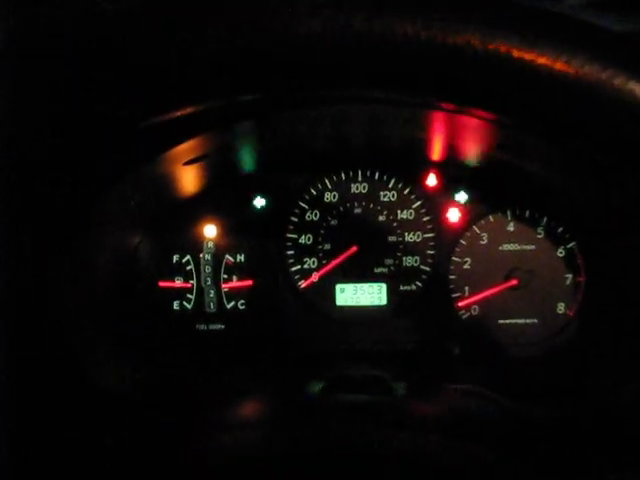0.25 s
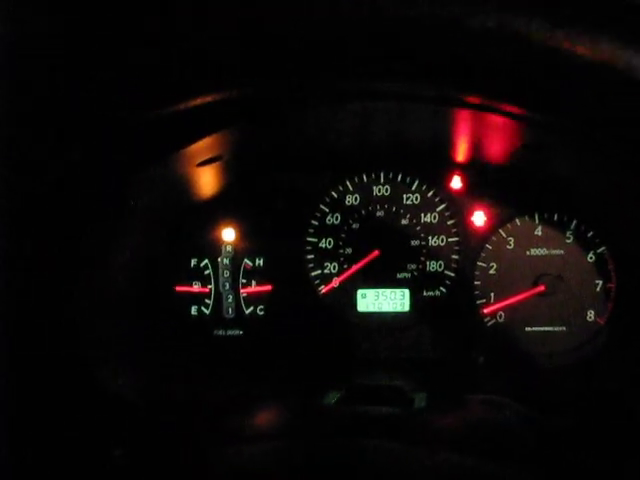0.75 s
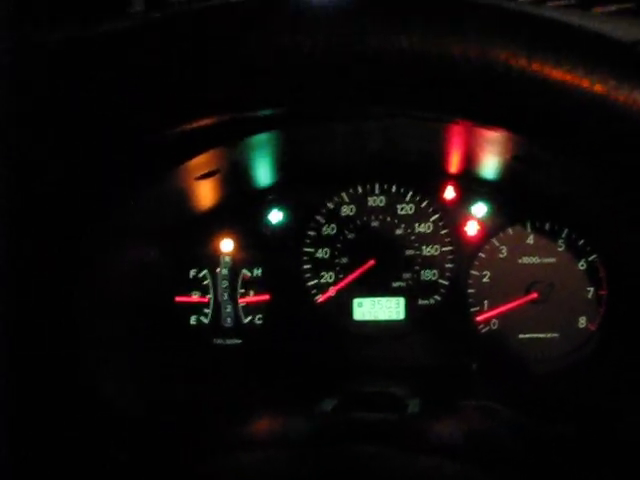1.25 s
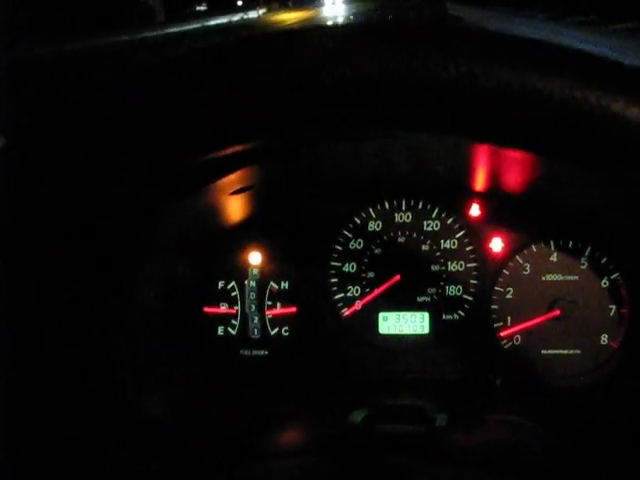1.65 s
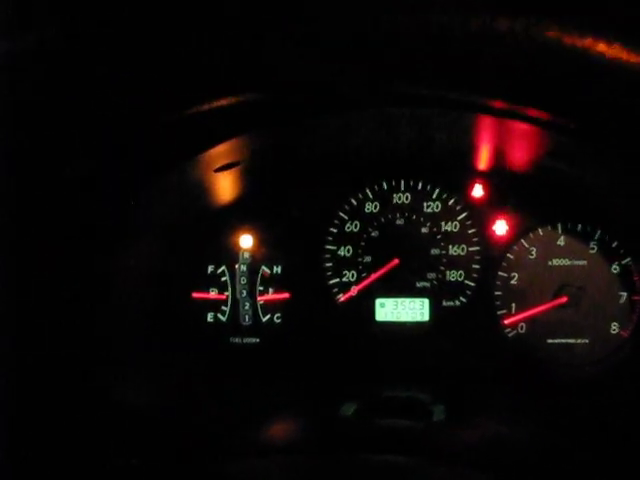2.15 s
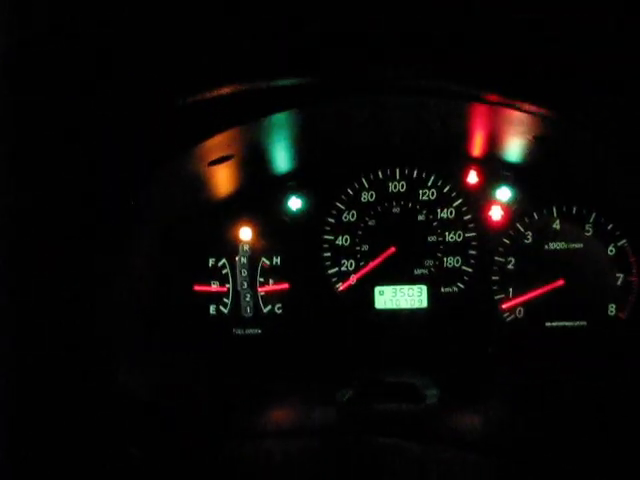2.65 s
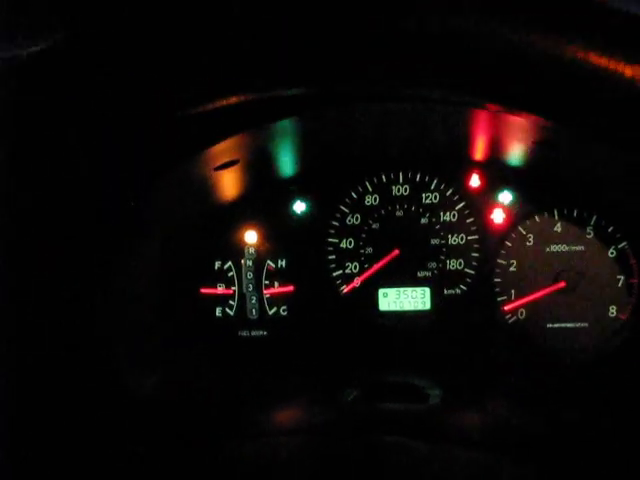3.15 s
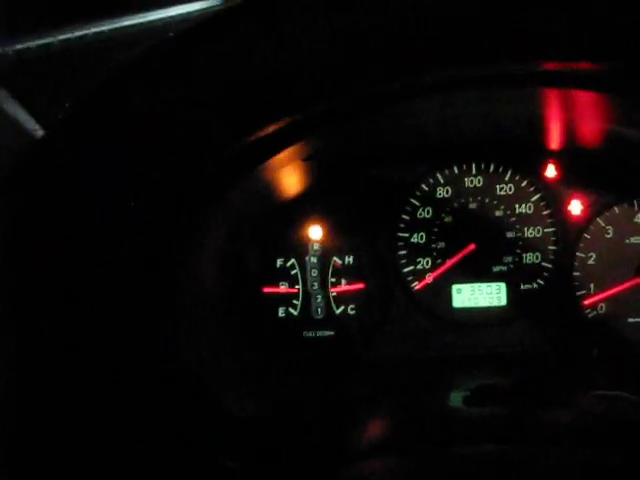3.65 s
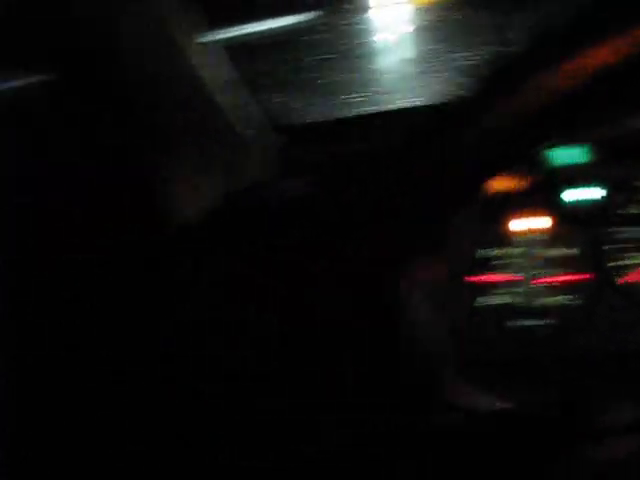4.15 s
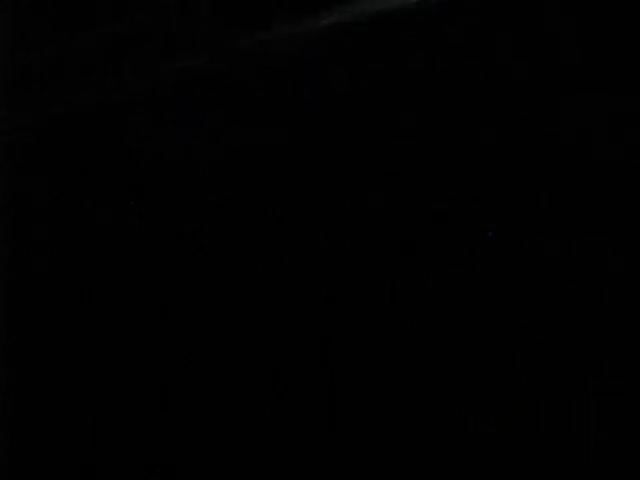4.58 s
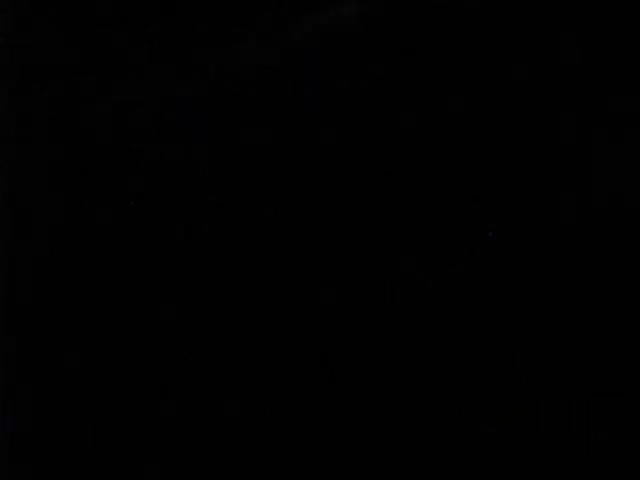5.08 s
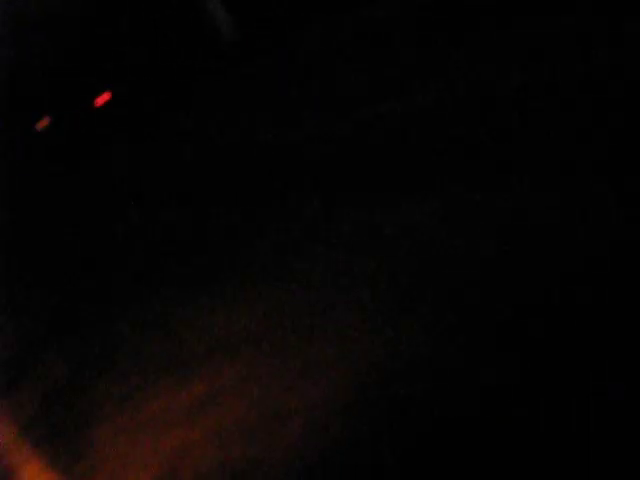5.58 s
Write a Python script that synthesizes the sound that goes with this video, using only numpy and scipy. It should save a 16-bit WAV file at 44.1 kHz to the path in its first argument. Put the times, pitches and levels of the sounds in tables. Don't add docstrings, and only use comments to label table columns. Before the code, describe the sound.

Inside a dark car at night, a four-cylinder engine idles with a low, booming exhaust drone that sags slightly and recovers. A turn-signal relay clicks in alternating brighter ticks and duller tocks. Light cloth rustle, tiny key tinkles and trim taps surround it. Around three seconds a hard lever knock makes the steady sound duck briefly. Then the handheld microphone turns to the window, with thumps, passing tyre wash and rough wind buffeting.

```python
import sys
import numpy as np
from scipy import signal
from scipy.fft import rfft, irfft, next_fast_len
from scipy.io import wavfile
from scipy.ndimage import uniform_filter1d

SR = 44100
rng = np.random.default_rng(int(sys.argv[2]) if len(sys.argv) > 2 else 0)


def undo_db(level):
    steps = np.asarray(level, float) / 20
    return 10 ** steps


def output_pcm(signal):
    pcm = np.clip(np.atleast_2d(signal).T, -1, 1) * 32767
    wavfile.write(sys.argv[1], SR, np.round(pcm).astype(np.int16))


N = 256647
FFT_LENGTH = next_fast_len(N)
TIME_S = np.arange(N) / SR
OPPOSED = np.array([[1], [-1]])
TURN_S, WINDOW_S = (2.96, 4.61), (4.626, 4.69)


def band(x, lo_hz, hi_hz, order=2):
    return signal.sosfilt(signal.butter(order, [lo_hz, min(hi_hz, .45 * SR)], "band", fs=SR, output="sos"), x)


def unit(x):
    return x / np.sqrt(np.mean(x ** 2))


def walk(rate):
    hold = int(SR / rate)
    steps = np.repeat(rng.standard_normal(N // hold + 1), hold)
    return 1.49 * uniform_filter1d(uniform_filter1d(steps, hold), hold)[:N]


def curves(table):
    s, *columns = np.transpose(table)
    return [np.interp(TIME_S, s, column) for column in columns]


def ramp(start_s, end_s):
    return np.clip((TIME_S - start_s) / (end_s - start_s), 0, 1)


def bell(s, half_s):
    return np.exp(-((TIME_S - s) / half_s) ** 2)


def pair(x, pan_db):
    return np.array([x * undo_db(pan_db / 2), x * undo_db(-pan_db / 2)]).reshape(2, -1)


def add(out, s, sound):
    i = int(s * SR)
    out[:, i:i + sound.shape[1]] += sound[:, :N - i]


# t/s, firing rate f/Hz
FIRING_RATE = [(0, 22.5), (.25, 22.9), (.5, 22.65), (1, 22.75), (1.45, 22.15), (1.8, 22.15), (2, 21.75),
               (2.15, 21.8), (2.3, 22.4), (2.5, 22.85), (2.75, 22.9), (3.06, 23.5), (3.5, 23.4),
               (3.9, 23.9), (4.1, 23.7), (4.7, 24.3), (5.82, 23.7)]
# level/dB, change per Hz of sag/dB, change on turning/dB, further change at the window/dB
LOW_HARMONICS = [
    (-16, 1.5, -12.5, -3),
    (-21, 5, -1, -7),
    (-20, -5, -8, -0.5),
    (-23, -3, 1, -1),
]
LOW_SIDE_SHARE = [.02, .02, .05, .11]
# multiple of the firing rate, level re first/dB, opposed share at the side ports [0-1]
UPPER_HARMONICS = [(5, -8, .05), (6, -17, .12), (7, -27, .1), (8, -27, .07), (13, -37, .1), (14, -38, .1)]
# f/Hz, phase lag of all that lies above/rad
CABIN_RESONANCES = [(57, 1.9), (102, 2.2)]
THROB_DEPTH = {1: .55, 5: .55, 6: .3}
SAG_HZ = 22.6
NULL_HZ, NULL_WIDTH_HZ, NULL_DB = 44.0, .45, -13


def exhaust(spread=.2, lead_per_hz=.9, turn_lead=2.8, wander_db=.4, wander_rad=.07):
    (hz,), turn, window = curves(FIRING_RATE), ramp(*TURN_S), ramp(*WINDOW_S)
    sag = np.maximum(SAG_HZ - hz, 0)
    lines = []
    for k, (db, sag_db, turn_db, window_db) in enumerate(LOW_HARMONICS, 1):
        null_db = NULL_DB * np.exp(-((k * hz - NULL_HZ) / NULL_WIDTH_HZ) ** 2 / 2)
        level_db = db + sag_db * sag + turn_db * turn + window_db * window + null_db
        lines.append((k, level_db, LOW_SIDE_SHARE[k - 1]))
    first_db = lines[0][1]
    for k, db, side in UPPER_HARMONICS:
        turn_db = 4.0 if k < 6 else 13.0
        lines.append((k, first_db + 1.75 * window + turn_db * turn + db, side))
    turns = 2 * np.pi * np.cumsum(hz) / SR
    lead = lead_per_hz * (22.75 - hz) + turn_lead * turn
    shake = unit(band(rng.standard_normal(N), 22, 125, order=3))
    out = undo_db(first_db - 13.5 + 2 * turn) * shake
    for k, db, side in lines:
        lag = sum(rad * (k * SAG_HZ > f) for f, rad in CABIN_RESONANCES)
        phase = k * turns + lead - spread * k ** 2 - lag + wander_rad * np.sqrt(k) * walk(6)
        waver_db = wander_db * (1 + turn + window) * min(1 + k * k / 12, 5) * walk(7)
        size = np.sqrt(2) * undo_db(db + waver_db)
        throb = THROB_DEPTH.get(k, 0) * np.cos(turns / 4 + .75 - .37 * (k - 1))
        size = size * (1 + ramp(3.0, 3.4) * throb)
        out = out + size * (np.cos(phase) - side * np.sin(phase) * OPPOSED)
    return out


def gain_of_points(points):
    hz, db = np.transpose(points)
    f = np.maximum(np.arange(FFT_LENGTH // 2 + 1) * SR / FFT_LENGTH, 1)
    return undo_db(np.interp(np.log(f), np.log(hz), db, left=-200, right=-200))


# f/Hz, left-right correlation [-1 to 1]
COHERENCE = [(60, 0.99), (300, 0.98), (1000, 0.75), (2000, 0.25), (4000, -0.093), (16000, -0.0075)]


def spread_noise(points, flicker_db, flicker_rate, shared_db, grain_db, lo_hz, hi_hz):
    grains = grain_db * uniform_filter1d(rng.exponential(size=N), size=24) + shared_db * walk(2 * flicker_rate)
    mid, side = rfft(rng.standard_normal((2, N)) * undo_db(grains), FFT_LENGTH) * gain_of_points(points)
    octave = np.log2(np.arange(FFT_LENGTH // 2 + 1) * SR / FFT_LENGTH + 1)
    hz, correlation = np.transpose(COHERENCE)
    like = np.clip(np.interp(octave, np.log2(hz), correlation), -.99, .99)
    mid, side = mid * np.sqrt(1 + like), side * np.sqrt(1 - like)
    both = np.array([mid + side, mid - side])
    lowest, highest = int(np.log2(points[1][0])), int(np.log2(points[-2][0])) + 1
    out = 0
    for centre in range(lowest, highest + 1):
        window = np.clip(1 - abs(octave - centre), 0, 1)
        out = out + undo_db(flicker_db * walk(flicker_rate)) * irfft(both * window, FFT_LENGTH)[:, :N]
    return out / np.std(band(out.mean(axis=0), lo_hz, hi_hz, order=4))


# t/s, length/s, level change/dB
RESTS = [(0.643, 0.061, 1.5), (0.75, 0.089, -2), (1.134, 0.038, -4), (1.394, 0.1, -6), (1.706, 0.034, -4.5),
         (2.17, 0.2, -4), (2.502, 0.068, -8.5), (3.487, 0.1, 0.5), (3.683, 0.13, -3.5)]


def resting_db():
    dips = sum(db * ((TIME_S > s) & (TIME_S < s + length)) for s, length, db in RESTS)
    return uniform_filter1d(dips, size=400)


# f/Hz, level per Hz/dB
RUMBLE_SPECTRUM = [(82, 6.5), (140, -6.5), (161, -4), (195, -9), (232, -16.5), (306, -13.5), (367, -22.5),
                   (700, -27), (910, -39), (1540, -120)]
# f/Hz, level per Hz/dB
HISS_SPECTRUM = [(210, -47), (350, -1.5), (552, -6.5), (738, -3.5), (953, 0.5), (1050, -2), (1820, -6),
                 (2100, -14.5), (3060, -17.5), (5000, -36), (6500, -37), (11000, -120)]
# f/Hz, level per Hz/dB
STREET_SPECTRUM = [(260, -57), (450, -11.5), (513, -10), (723, 1), (1060, -8.5), (1720, -10), (1940, -14.5),
                   (5000, -32.5), (6500, -52), (11000, -120)]
# f/Hz, level per Hz/dB
RUSTLE_SPECTRUM = [(1470, 0), (2500, -1), (3330, -1.5), (4100, -3.5), (4820, -4.5), (5660, -8), (9640, -13),
                   (10600, -15.5), (15800, -17.5)]
# t/s, level/dB
STIR = [(0, -48), (.21, -41), (.41, -48.5), (.68, -51.5), (.92, -47), (1.3, -44.5), (1.6, -47.5),
        (1.93, -42), (2.07, -48), (2.35, -42.5), (3.05, -46.5), (3.5, -48.5), (3.9, -48.5), (4.28, -43),
        (4.6, -42.5), (5.2, -55), (5.56, -51.5), (5.82, -59)]
# t/s, half length/s, rise/dB
GRIPS = [(0.357, 0.049, 5), (1.99, 0.069, 10), (2.99, 0.64, 4.5), (3.697, 0.041, 9), (3.953, 0.29, 4),
         (4.215, 0.15, 9), (4.726, 0.3, 12)]
# t/s, half length/s, rise/dB
PASSES = [
    (4.288, 0.31, 5),
    (4.71, 0.34, 7.5),
    (5.117, 0.18, 5),
    (5.61, 0.18, 6.5),
]
RUMBLE_DB, HISS_DB, HISS_PER_STIR = -40.5, -37, 0.25


def cabin():
    (stir_db,), outside = curves(STIR), ramp(*TURN_S)
    rest_db = resting_db()
    rumble_db = RUMBLE_DB + sum(db * bell(s, half) for s, half, db in GRIPS)
    hiss_db = HISS_DB + sum(db * bell(s, half) for s, half, db in PASSES)
    hiss_db = hiss_db + HISS_PER_STIR * (1 - outside) * (stir_db + 39 + 0.8 * rest_db)
    rumble = spread_noise(RUMBLE_SPECTRUM, 1.5, 12, 1.5, 0, 190, 450)
    hiss = spread_noise(HISS_SPECTRUM, .8, 14, 1.2, 5, 600, 2500)
    street = spread_noise(STREET_SPECTRUM, 1, 10, 1, 2, 600, 2500)
    rustle = spread_noise(RUSTLE_SPECTRUM, .7, 14, 1.6, 8, 4000, 14000)
    rustle = rustle + ramp(4.5, 5.5) * (band(rustle, 1200, 12000, order=1) - rustle)
    hiss = np.sqrt(1 - outside) * hiss + np.sqrt(outside) * street
    return undo_db(rumble_db) * rumble + undo_db(hiss_db) * hiss + undo_db(stir_db + rest_db) * rustle


# t/s, level/dB, f/Hz, length/s
METAL_TOUCHES = [(.09, -50, 12100, .05), (.09, -50, 10300, .05), (.205, -48, 12100, .09),
                 (.235, -42, 10300, .06), (.25, -46, 9360, .03), (.255, -46, 6140, .04),
                 (.255, -44, 5000, .04), (1.47, -48, 7250, .08), (2.19, -48, 5000, .06),
                 (3.15, -49, 2920, .03), (.977, -29, 2350, .006), (3.335, -57, 5200, .1),
                 (3.388, -38, 5200, .01), (3.402, -35, 5450, .022), (3.05, -30, 2480, .015),
                 (3.415, -37, 2000, .014), (1.118, -36, 1900, .012), (3.4, -36, 10800, .012)]


def metal():
    out = np.zeros((2, N))
    for s, db, hz, length in METAL_TOUCHES:
        t = np.arange(int(length * SR)) / SR
        wide = 1 + max(.007, .0006 / length)
        swell = np.minimum(8 * t / length, 1) * (1 - t / length)
        touches = rng.standard_normal((2, len(t))) * swell
        add(out, s, undo_db(db) * unit(band(touches, hz / wide, hz * wide, order=1)))
    return out


# t/s, length/s, level/dB, lowest f/Hz, highest f/Hz
DRAGS = [(.203, .111, -35, 1500, 14000), (.271, .042, -31, 510, 996), (.881, .1, -43.5, 2000, 15000),
         (1.46, .097, -41.5, 2950, 15100), (1.921, .065, -31, 450, 1230), (2.833, .095, -33.5, 500, 2460),
         (3.398, .037, -34, 1000, 6960), (4.492, .043, -29.5, 2480, 10500),
         (4.103, .074, -40.5, 2000, 11940), (4.758, .075, -33, 500, 2410), (3.08, .17, -41, 400, 1800),
         (4.5, .035, -39, 10000, 15000), (3.69, .17, -33, 220, 340), (2.41, .085, -44, 2500, 14000),
         (4.598, .016, -41, 2000, 14000), (4.648, .014, -41, 2000, 8000), (3.05, .014, -31, 900, 5500),
         (3.384, .014, -35, 800, 3800), (3.072, .014, -36, 2500, 9000), (.69, .05, -49, 5000, 12000),
         (1.055, .035, -48, 6000, 15000), (4.49, .04, -33, 700, 3000), (3.199, .03, -42, 500, 4300),
         (3.066, .012, -22, 500, 3000), (3.113, .022, -34, 1500, 5500), (5.19, .012, -52, 3000, 12000)]


def rubs():
    out = np.zeros((2, N))
    for s, length, db, lo_hz, hi_hz in DRAGS:
        t = np.arange(int(length * SR)) / SR
        slips = np.repeat(1 + rng.exponential(size=200), 40)
        grains = (rng.standard_normal((2, 8000)) * slips)[:, :len(t)]
        add(out, s, undo_db(db) * unit(band(grains, lo_hz, hi_hz)) * np.sin(np.pi * t / length) ** .5)
    return out


def relay(events, modes, chatter_s, landing=5.0):
    out, t = np.zeros((2, N)), np.arange(SR // 20) / SR
    case = sum(undo_db(db) * np.sin(2 * np.pi * hz * t) * undo_db(-60 * t / min(t60, .012)) for hz, db, t60 in modes)
    for s, db, pan_db in events:
        chatter = rng.standard_normal((2, len(t))) * np.minimum(t / .0007, 1) * np.exp(-t / chatter_s)
        hiss = band(chatter, 3500, 17500)
        chatter[:, 20] += landing
        chatter[1] = 0.092 * chatter[0] + 0.69 * chatter[1]
        ring = signal.fftconvolve(chatter, case[None], axes=1)[:, :len(t)]
        ring = ring / np.abs(ring).max() + 0.42 * hiss
        add(out, s - .0005, undo_db(db - 1.5) * ring * pair(np.ones(1), pan_db))
    return out


# f/Hz, level/dB, decay time T60/s (cut to at most 0.012)
TICK_MODES = [(2950, -26, 0.04), (3456, 8, 0.012), (4660, 3.5, 0.018), (5250, -23, 5.0), (7040, -5, 0.032),
              (9900, -6, 0.021), (10720, -3.5, 0.02), (13200, -4, 0.013), (3940, 2, .008)]
# f/Hz, level/dB, decay time T60/s (cut to at most 0.012)
TOCK_MODES = [(2880, -25.5, 0.78), (3220, 8, 0.019), (4400, 4, 0.031), (6240, -6, 0.011), (7740, 0, 0.037),
              (9300, -3, 0.047), (10650, 10.5, 0.072), (11150, -4, 0.063)]
FLASH_S, TICK_S, TOCK_S = .7186, .5925, .2418
TICK_DB, TOCK_DB, RELAY_PAN_DB, RELAY_TURN_PAN_DB = -11, -14, 0, -3


def flasher():
    ticks = [(TICK_S + k * FLASH_S, TICK_DB, RELAY_PAN_DB) for k in range(6)]
    tocks = [(TOCK_S + k * FLASH_S, TOCK_DB, RELAY_PAN_DB) for k in range(7)]
    clicks = relay(ticks, TICK_MODES, chatter_s=.0035) + relay(tocks, TOCK_MODES, chatter_s=.0045)
    fade_db = -4.5 * ramp(*TURN_S) - 3.0 * ramp(*WINDOW_S)
    return clicks * pair(undo_db(fade_db), RELAY_TURN_PAN_DB * ramp(*TURN_S))


def strike(x):
    return x / np.std(x[:, :SR // 200])


# t/s, panel level/dB, crack level/dB, fizz level/dB
KNOCK_EVENTS = [(.296, -28, -44, -43), (.356, -28.5, -38, -51), (.978, -43, -33, -38),
                (1.1117, -31, -19.5, -19.5), (1.744, -32, -38.5, -42), (2.134, -30, -30, -46),
                (2.592, -52, -54, -42), (2.692, -39, -35, -21.5), (2.852, -27, -34.5, -45),
                (2.899, -31, -39, -41), (2.938, -42, -53, -35), (3.049, -20, -25, -30),
                (3.0655, -13, -19.5, -30), (3.07, -21.5, -35, -25), (3.112, -15.5, -23.5, -26),
                (3.152, -39, -51, -55), (3.199, -33.5, -66, -57), (3.385, -25, -40, -53),
                (3.4, -24, -32, -39), (3.672, -24, -40, -42), (3.986, -25, -58, -61),
                (4.074, -33, -52, -34), (4.135, -28, -33, -51), (4.487, -15.5, -21.5, -29),
                (4.549, -17, -27, -34), (4.595, -42, -30, -26), (5.254, -45, -63, -51),
                (5.307, -31, -42, -50), (5.697, -29.5, -64, -53), (5.802, -44, -62, -61)]
PANEL_HZ = 990


def knocks(panel_t60=.045, crack_t60=.021):
    out, t = np.zeros((2, N)), np.arange(SR // 10) / SR
    for s, panel_db, crack_db, fizz_db in KNOCK_EVENTS:
        noise, blows = rng.standard_normal((2, len(t))), rng.exponential(size=len(t) // 32 + 1)
        noise[1] = 0.52 * noise[0] + 0.84 * noise[1]
        noise = noise * np.repeat(.6 + blows, 32)[:len(t)] * np.minimum(t / .0004, 1)
        short = noise * undo_db(-60 * t / crack_t60)
        panel = strike(band(noise * undo_db(-60 * t / panel_t60), PANEL_HZ / 1.8, PANEL_HZ * 2.2))
        crack = strike(band(short, 1600, 5200))
        fizz = strike(band(short, 5500, 11500))
        add(out, s, undo_db(panel_db - 3.0) * panel + undo_db(crack_db + 0.1) * crack + undo_db(fizz_db - 5.0) * fizz)
    return out


# f/Hz, level/dB, decay time T60/s
LEVER_MODES = [(377, -4.5, 0.033), (610, 6.5, 0.006), (904, -10, 0.082), (1210, -13.5, 0.042),
               (1464, -2, 0.05), (1830, -14, 0.018), (2470, -2.5, .014), (2760, -10, .02),
               (3390, -22, 0.038), (3860, -14, 0.02), (4800, -28, 0.026)]
LATCH_MODES = [(189, -1, 0.059), (390, -2.5, 0.055), (460, -5.5, 0.049), (700, -21, 0.023),
               (1270, -13.5, .025), (960, -11, 0.049), (1960, -19, 0.043), (3680, -22, 0.03),
               (2920, -19, 0.14)]
CLIP_MODES = [(1050, 5, 0.012), (1410, -8, 0.011), (3770, -10, 0.015), (1940, -18, 0.032), (2430, -5, 0.02),
              (3140, -6, 0.013), (4480, -0.5, .015), (4780, -2, 0.016), (6640, -9, 0.018),
              (9000, -19, 0.026)]
BUTTON_MODES = [(840, 3.5, 0.021), (1720, 0, 0.019), (2320, -2, 0.039), (2800, -1, 0.032),
                (5060, -2.5, 0.025), (7550, 4, 0.032), (11200, -10, .03)]
STRAP_MODES = [(1335, 4.1, 0.04), (2350, 2, 0.017), (3200, 1, 0.016)]
KEY_MODES = [(5330, 5.5, 0.013), (5400, -6, 0.016), (3320, -6, 0.013), (4000, -9, 0.011), (6200, -3, 0.017),
             (7030, -5, 0.014), (11100, -12, 0.018)]
# t/s, level/dB
LEVER_HITS = [
    (3.0654, -7),
    (3.0677, -12),
    (3.0706, -12),
    (3.0761, -19),
]
LATCH_HITS = [
    (3.112, -12.5),
    (3.1176, -13.5),
    (3.1216, -19),
]
CLIP_HITS = [
    (1.1125, -15),
    (1.1137, -22),
]
BUTTON_HITS = [
    (2.6922, -19.5),
]
STRAP_HITS = [
    (5.3071, -30),
]
KEY_HITS = [(3.3895, -29), (3.3935, -29), (3.3995, -24), (3.4014, -15), (3.409, -27), (3.414, -28),
            (3.431, -33)]
# t/s, level/dB, f/Hz, decay time
# T60/s
SINGLE_MODE_HITS = [(1.7455, -23, 460, 0.043), (1.746, -29.5, 950, .03), (1.875, -31, 990, .025),
                    (1.947, -21, 835, 0.034), (1.961, -22.5, 860, .03), (1.962, -13, 520, 0.018),
                    (2.592, -14.5, 955, 0.014), (2.852, -17, 850, .025), (2.869, -20, 750, 0.034),
                    (2.883, -23, 990, .03), (2.9, -25, 750, 0.025), (2.903, -22, 2200, 0.037),
                    (4.487, -28, 5050, 0.017), (4.595, -24, 1490, 0.013), (5.2545, -22, 1090, .025),
                    (5.8025, -28, 795, .02), (5.19, -12, 370, 0.045), (4.895, -16.5, 420, 0.052),
                    (4.261, -17, 180, 0.098), (4.689, -7, 95, 0.083), (5.36, -19, 250, 0.047),
                    (1.632, -29, 220, 0.055), (.978, -24, 2330, .025), (4.553, -20, 1900, .015),
                    (3.199, -30, 1500, .015), (5.194, -23, 1750, .015), (5.194, -22, 950, .015),
                    (4.836, -16, 620, .025), (4.905, -18, 700, .015), (4.823, -20, 1050, .02),
                    (4.787, -18, 750, .025), (5.473, -18, 450, .03), (5.667, -17, 950, .02),
                    (5.67, -23, 1550, .015), (4.78, -10, 60, .08), (4.8, -9, 110, .06), (4.862, -7, 62, .08),
                    (5.408, -9, 55, .07), (5.422, -7, 50, .07), (5.546, -9, 62, .07), (5.568, -10, 75, .06),
                    (4.426, -8, 55, .07), (4.466, -8, 60, .06), (4.893, -8, 45, .05), (5.125, -11, 75, .06),
                    (3.0654, -7, 620, .01), (.296, -25, 620, .03)]


def rings(side=0.54):
    out, t = np.zeros((2, N)), np.arange(SR // 10) / SR
    parts = [(LEVER_MODES, LEVER_HITS), (LATCH_MODES, LATCH_HITS), (CLIP_MODES, CLIP_HITS),
             (BUTTON_MODES, BUTTON_HITS), (STRAP_MODES, STRAP_HITS), (KEY_MODES, KEY_HITS)]
    hits = list(SINGLE_MODE_HITS)
    for modes, blows in parts:
        hits += [(s, db + mode_db, hz, t60) for s, db in blows for hz, mode_db, t60 in modes]
    for s, db, hz, t60 in hits:
        detune, lag = rng.standard_normal(2)
        phase = 2 * np.pi * hz * (1 + .01 * detune) * t + side * np.sqrt(hz / 1000) * lag * OPPOSED
        attack = np.minimum(t * hz * 4, 1)
        add(out, s, undo_db(db - 60 * t / t60) * attack * np.sin(phase))
    return out


# t/s, peak level/dB, f/Hz, left minus right/dB
BODY_THUMPS = [(0.362, -33, 169.8, 3), (0.899, -19.5, 332, 3), (1.748, -18, 295, 1), (2.589, -19, 200, 0),
               (3.03, -7.5, 182, -0.5), (3.063, -10, 300, -2), (3.076, -7.5, 292, 1), (3.116, -10, 250, 1),
               (3.154, -16, 460, 1), (3.205, -15, 460, 3), (3.387, -6.5, 319, 1), (3.461, -21.5, 230, 3),
               (3.674, -4.5, 207, 1.5), (3.99, -10.5, 229, -1), (4.151, -16, 170, -2), (4.485, -6, 180, 18),
               (4.547, -1.5, 159, 1), (4.605, -7, 261, 1), (4.826, -7, 230, 0), (4.884, -6.5, 228, 5),
               (4.901, -7.5, 200, 16), (5.186, -9.5, 308, -26), (5.261, -8, 182, -18),
               (5.653, -8, 168, -17), (5.673, -9, 242, -13), (5.707, -5, 204, -12)]
THUMP_T60_S = 0.083


def thumps(push_s=0.00045, rough=0.39):
    out, t = np.zeros((2, N)), np.arange(SR // 5) / SR
    for s, db, hz, pan_db in BODY_THUMPS:
        push = np.exp(-t / push_s) + rough * rng.standard_normal((2, len(t))) * np.exp(-t / 0.006)
        modes = ((1.065, 0.86), (0.847, 0.49), (1.5, 0.13))
        body = sum(gain * np.sin(2 * np.pi * ratio * hz * t) for ratio, gain in modes)
        ring = signal.fftconvolve(push, body[None] * undo_db(-60 * t / THUMP_T60_S), axes=1)[:, :len(t)]
        ring = band(ring, 150, 600) * pair(np.ones(1), np.clip(pan_db, -10, 10))
        add(out, s, undo_db(db - 5.5) * ring / np.abs(ring.mean(axis=0)).max())
    return out


# t/s, level change/dB, recovery time/s
OVERLOADS = [
    (3.067, -20.5, 0.29),
    (4.5, -2, 0.89),
    (4.912, -3.5, 0.76),
    (5.7, -1.5, 0.58),
]


def ducking_db():
    drops = 0
    for s, db, recovery_s in OVERLOADS:
        drops = drops + db * (TIME_S > s) * np.exp(-np.maximum(TIME_S - s, 0) / recovery_s)
    return uniform_filter1d(drops, size=400)


# t/s, half length/s, buffet level/dB, flutter level/dB, left minus right/dB
PORT_GUSTS = [(4.369, 0.037, -12, -55, 9), (4.445, 0.084, -17.5, -34, -3), (4.553, 0.058, -22, -18.5, -2),
              (4.68, 0.096, -21.5, -38, 1), (4.835, 0.015, -6.5, -12, 3.5), (4.89, 0.014, -6.5, -15, -4),
              (4.975, 0.12, -18, -28.5, 5.5), (5.125, 0.013, -7, -42, -3), (5.194, 0.026, -19, -17, -17.5),
              (5.242, 0.081, -23, -31, -13.5), (5.425, 0.027, -12, -27.5, 4), (5.481, 0.031, -19, -30, -8),
              (5.593, 0.035, -15, -18, -11), (5.662, 0.037, -24, -19, -21.5),
              (5.721, 0.07, -25, -19.5, -11)]
AIR_START_S = 4.2


def air(shared=0.59, eddy_db=2.5, calm_db=-34, spray_db=-15):
    shapes = np.array([bell(s, half) for s, half, *_ in PORT_GUSTS])
    buffet_db, flutter_db, pan_db = np.transpose(PORT_GUSTS)[2:]
    buffet = undo_db(buffet_db) @ shapes + undo_db(calm_db) * ramp(AIR_START_S, AIR_START_S + 0.21)
    flutter = undo_db(flutter_db) @ shapes ** 2
    pan_db = (pan_db @ shapes) / (shapes.sum(axis=0) + 0.044)
    spray = undo_db(spray_db) * flutter
    out = 0
    for size, lo_hz, hi_hz, rate in ((buffet, 28, 120, 25), (flutter, 130, 390, 45), (spray, 400, 1600, 140)):
        both, left, right = (unit(band(rng.standard_normal(N), lo_hz, hi_hz, order=3)) for _ in range(3))
        ports = shared * both + np.sqrt(1 - min(shared, 1) ** 2) * np.array([left, right])
        ports = ports / np.sqrt(uniform_filter1d(ports.mean(axis=0) ** 2, size=SR // 25) + 0.35)
        out = out + size * undo_db(eddy_db * np.array([walk(rate), walk(rate)])) * ports
    return out * pair(0.66, pan_db)


def scene():
    steady = pair(0.95, 0.53) * (exhaust() + cabin()) + flasher()
    handling = metal() + rubs() + knocks() + rings() + thumps()
    return undo_db(ducking_db()) * steady + handling + air()


def top_cut(x):
    return signal.sosfilt(signal.butter(12, 15700, fs=SR, output="sos"), x)


def record(dry):
    top = signal.butter(4, 14300, fs=SR, output="sos")
    mix = np.clip(signal.sosfilt(top, dry), -1, 1)
    return top_cut(mix)


dry = scene()
out = record(dry)
output_pcm(out)
```